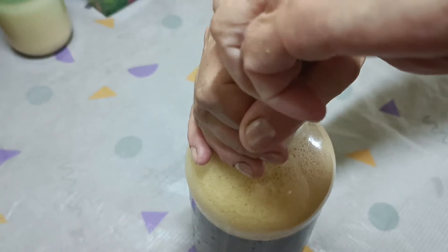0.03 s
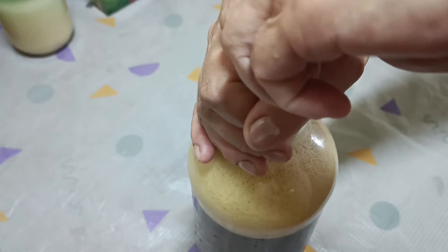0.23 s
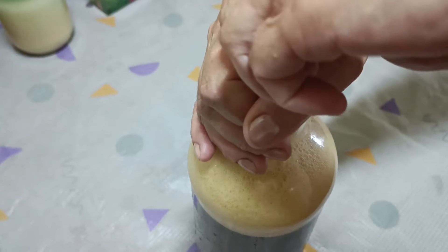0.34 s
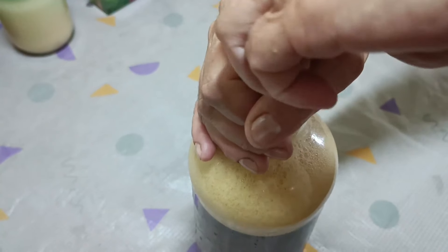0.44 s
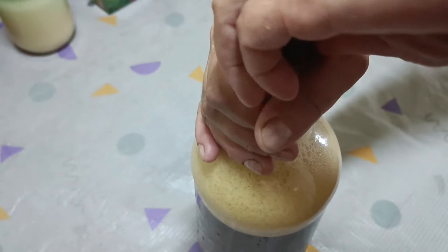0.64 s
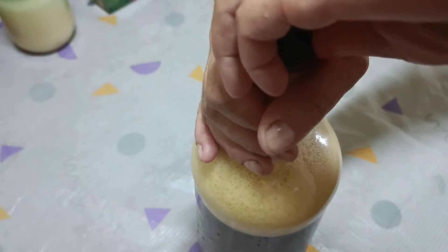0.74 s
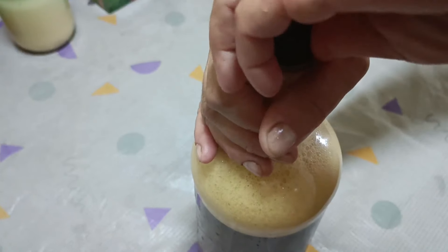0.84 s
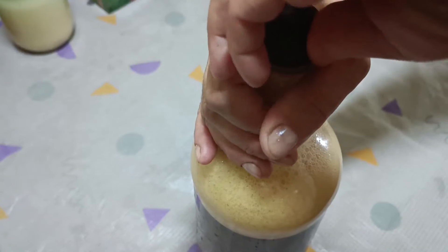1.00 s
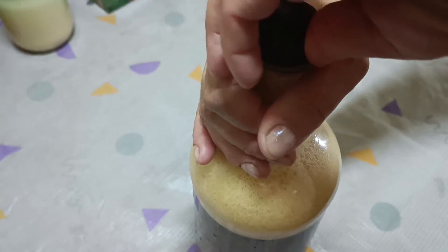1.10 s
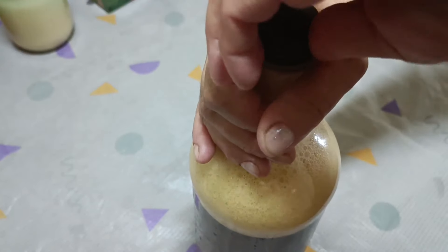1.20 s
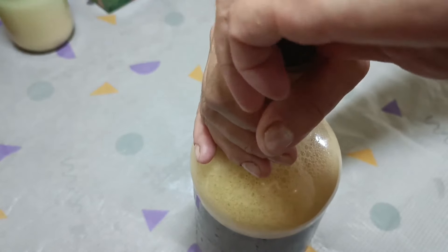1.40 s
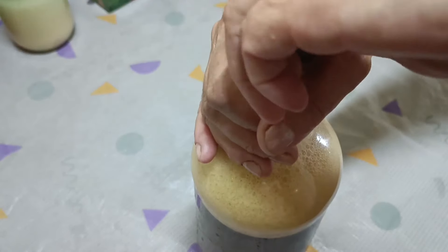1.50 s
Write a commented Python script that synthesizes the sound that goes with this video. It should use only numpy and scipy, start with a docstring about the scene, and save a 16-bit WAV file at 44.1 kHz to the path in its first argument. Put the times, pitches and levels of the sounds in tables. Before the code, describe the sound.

A short, loud hiss escapes a fizzy drink bottle, then faint cap rubs and bubble ticks.

```python
"""A screw cap is eased open on a plastic bottle of fizzy drink, close up in a small kitchen.
Over room tone and faint fizz, skin rubs the cap and a bubble ticks. Gas rushes through the thread
in one loud, sputtering hiss that buffets the hand and briefly nears a whistle; gain control ducks
the room under it. Then the hand shifts on the cap, small spurts escape and more bubbles tick."""
import sys
import numpy as np
from scipy import signal
from scipy.fft import rfft, irfft
from scipy.io import wavfile
from scipy.ndimage import uniform_filter1d

SR = 44100
rng = np.random.default_rng(int(sys.argv[2]) if len(sys.argv) > 2 else 0)


def inscribe(sig):
    """Save sig as 16-bit PCM at rate SR to the path in sys.argv[1].

    A 1-D sig is mono; a 2-D sig holds one channel per row.
    Samples are clipped to [-1, 1] before scaling.
    """
    pcm = np.round(np.clip(np.atleast_2d(sig).T, -1, 1) * 32767)
    wavfile.write(sys.argv[1], SR, pcm.astype(np.int16))


N = 68355
TIME_S, FREQ_HZ = np.arange(N) / SR, np.fft.rfftfreq(N, 1 / SR)
FLUTTER_HZ, BAND_LIMIT_HZ = 157, 15780

# spectra (frequency [Hz], relative density [dB])
ROOM_SPECTRUM = [(20, -22), (48, -17), (85, -4), (140, 0.5), (290, -1), (450, -5), (950, -16.5),
                 (2000, -19.5), (3200, -20.5), (3800, -19.5), (5000, -19.5), (6600, -17), (8300, -19.5),
                 (8900, -27), (11000, -24), (13300, -24), (15400, -21)]  # room air and microphone hiss
BUBBLE_SPECTRUM = [(1000, -30), (6800, -23), (8350, -6), (9000, -9), (12500, -25), (15000, -10)]
RUB_SPECTRUM = [(200, -25), (700, 0), (1200, -3), (1850, 5), (2900, -8), (4300, -13.5), (5500, 2),
                (7300, -6.5), (9000, -22.5), (15500, -16)]  # skin on plastic
SPURT_SPECTRUM = [(1000, -34.5), (3300, -21), (4000, -5.5), (4500, 2), (5400, -1), (6200, -13), (7400, -6),
                  (8200, -6.5), (9200, -8.5), (10200, -19), (11000, -15), (15500, -27)]
JET_SPECTRUM = [(30, -33.5), (170, -40), (650, -33), (1200, -34.5), (1450, -30.5), (2100, -25.5),
                (2800, -19), (3300, -10), (3800, -9.5), (4500, -8.5), (5100, -5), (5650, -6.5),
                (6600, -4.5), (7700, -2.5), (8300, -3), (8800, -7.5), (9850, -17), (10800, -6.5),
                (12200, -18), (13600, -11.5), (14500, -11.5), (15700, -11)]  # through cap and cupped hand
# stereo likeness (frequency [Hz], left-right correlation [-1..1])
ROOM_CORRELATION = [(50, 0), (300, 0.11), (1000, 0), (4000, 0)]
JET_CORRELATION = [(200, 0.25), (800, 0.98), (1500, 0.39), (2000, -0.17), (2700, 0.3), (3100, 0.88),
                   (3800, 0.78), (4400, -0.16), (5400, 0.33), (6700, -0.37), (7400, 0.031), (8200, -0.49),
                   (9500, 0.14), (15000, 0.15)]
# hand moves on the cap (peak time [s], rise [s], decay [s], rub [dB], spurt [dB])
CAP_TURNS = [(0.13, .014, 0.015, -49.5, -58), (0.866, 0.014, .05, -52, -56),
             (.93, 0.012, 0.026, -59.5, -60), (1.027, 0.0053, 0.026, -43.5, -74),
             (1.033, 0.0022, 0.0048, -48, -47.5), (1.24, 0.0077, 0.03, -55.5, -44),
             (1.2479, 0.0019, 0.0024, -66, -33.5), (1.335, 0.011, 0.01, -52, -55.5),
             (1.546, 0.016, 0.013, -48, -56)]
# bursting bubbles (time [s], relative level [dB])
BUBBLE_BURSTS = [(.18, -29), (.72, -22), (.872, -25), (1.287, -23), (1.359, -23), (1.391, -25),
                 (1.4125, -23), (1.422, -23), (1.4405, -26), (1.524, -25)]
# jet direction (frequency [Hz], left minus right [dB])
JET_PAN = [(1000, -2), (2050, 7), (2600, -14.5), (3100, 0.5), (3550, 1), (4300, 5.5), (5250, 0), (6600, 3),
           (8000, -1.5), (9000, -10), (9900, -3), (10800, 4.5), (13500, 1), (15500, 8)]
# jet colour as the gap changes (time [s], low [dB], 6 kHz band [dB], treble [dB])
JET_BAND_GAINS = [(.21, 10, 5, 1), (0.234, 3, 1.5, -1.5), (.272, 3, 2, 3), (0.309, 1, 5.5, 3),
                  (.345, 1, -1.5, 1.5), (.39, -1.5, -1, 0), (.44, -2, 1.5, -1.5), (.48, 2, -2, 1),
                  (0.531, 1.5, 2, -4)]
# envelopes of the gas rush (time [s], relative level [dB])
FLOW_ENVELOPE = [(.199, -67), (.21, -43.5), (.218, -24.5), (.24, -11.5), (.268, -5), (.3, -7.5),
                 (.325, -9.5), (.36, -9), (.395, -9), (.44, -9.5), (.475, -12), (.497, -26), (.512, -40.5),
                 (.545, -40.5), (.563, -76)]
BUFFET_ENVELOPE = [(.205, -52), (.245, -45.5), (.278, -42), (.305, -76)]
WHISTLE_ENVELOPE = [(.25, -36), (.305, -6), (.328, -4), (.355, -5.5), (.378, -7), (.389, 0), (.41, -12),
                    (.47, -50), (.5, -65.5)]
# resonances (frequency [Hz], width [Hz], boost [dB])
CAP_GAP_MODES = [(1445, 114, 3), (2050, 93, 3), (3847, 73, 4.5), (5210, 290, 5.5), (5280, 98, 2.5),
                 (5750, 88, 3.5)]
LEFT_PORT_MODES = [(7366, 396, 9.03), (8900, 200, 1.7)]
RIGHT_PORT_MODES = [(8347, 160, 11.24)]
# hand, table and close hard surfaces (left delay [s], right delay [s], level [dB])
REFLECTIONS = [(.0031, 0.0037, -17.5), (.0074, 0.005, -12), (0.0114, .0139, -23.5)]


def amp(db):
    """Decibels to gain."""
    return 10 ** (np.asarray(db) / 20)


def unit_rms(x):
    """Scale to rms 1."""
    return x / np.sqrt(np.mean(x ** 2) + 1e-20)


def over_hz(points):
    """Interpolate a table over log frequency."""
    hz, value = np.transpose(points)
    return np.interp(np.log(FREQ_HZ + 1), np.log(hz), value)


def envelope(points):
    """Gain from a level curve, silent outside it."""
    return amp(np.interp(TIME_S, *np.transpose(points), left=-np.inf, right=-np.inf))


def filtered(x, gain):
    """Apply a gain per frequency."""
    return irfft(rfft(x) * gain, N)


def resonances(modes):
    """Flat response plus resonant peaks."""
    return 1 + sum((amp(db) - 1) / (1 + 2j * (FREQ_HZ - hz) / width_hz) for hz, width_hz, db in modes)


def pan(left_db):
    """Stereo gains from left minus right level."""
    return amp(np.array([[.5], [-.5]]) * left_db)


def noise(correlation=0):
    """Stereo white noise."""
    left, other = rng.standard_normal((2, N))
    shared = np.clip(correlation, -1, 1)
    return np.array([left, filtered(left, shared) + filtered(other, np.sqrt(1 - shared ** 2))])


def wobble(rate_hz):
    """Low-passed random motion, rms 1."""
    return unit_rms(filtered(rng.standard_normal(N), np.exp(-(FREQ_HZ / rate_hz) ** 2)))


def clicks(per_s, spread_db):
    """Sparse stereo impulses of uneven size."""
    size = amp(spread_db * np.minimum(rng.exponential(1, N), 4))
    return unit_rms(size * (rng.random(N) < per_s / SR) * rng.standard_normal((2, N)))


def fluttering_noise(correlation, bands=9, depth_db=2.13):
    """Noise whose bands flutter independently."""
    white = noise(correlation)
    centres_hz = np.linspace(0, BAND_LIMIT_HZ, bands)
    parts = (filtered(white, np.interp(FREQ_HZ, centres_hz, band)) for band in np.eye(bands))
    return unit_rms(sum(part * amp(depth_db * wobble(FLUTTER_HZ)) for part in parts))


def room_tone(level_db=-48):
    """Low murmur of room air, thin microphone hiss."""
    air = filtered(noise(over_hz(ROOM_CORRELATION)), amp(over_hz(ROOM_SPECTRUM)))
    return amp(level_db) * unit_rms(air)


def bubbles(fizz_db=-69, tick_db=-16.5, decay_s=0.0012):
    """Bursting bubbles: constant faint fizz, single bright ticks."""
    fizz = amp(fizz_db) * clicks(per_s=140, spread_db=6.5)
    bursts = sum(amp(db) * (TIME_S >= at_s) * np.exp(-abs(TIME_S - at_s) / decay_s)
                 for at_s, db in BUBBLE_BURSTS)
    ticks = amp(tick_db) * bursts * noise()
    return filtered(fizz + ticks, unit_rms(amp(over_hz(BUBBLE_SPECTRUM)))) * pan(left_db=-2.5)


def cap_turns():
    """Skin rubs the cap and gas spurts out, swelling and dying together."""
    rub_gain, spurt_gain = np.zeros((2, N))
    for peak_s, rise_s, decay_s, rub_db, spurt_db in CAP_TURNS:
        swell = np.exp(-np.maximum((peak_s - TIME_S) / rise_s, (TIME_S - peak_s) / decay_s))
        rub_gain = np.hypot(rub_gain, amp(rub_db) * swell)
        spurt_gain = np.hypot(spurt_gain, amp(spurt_db) * swell)
    rub = unit_rms(filtered(fluttering_noise(correlation=0.15), amp(over_hz(RUB_SPECTRUM))))
    spurt = unit_rms(filtered(fluttering_noise(correlation=0.18), amp(over_hz(SPURT_SPECTRUM))))
    return rub_gain * rub * pan(left_db=3) + spurt_gain * spurt * pan(left_db=6.5)


def gas_hiss(spray_db=-11, sputter_db=0.13):
    """Turbulent gas and fine spray pass the thread and ring the gap under the cap."""
    gas = fluttering_noise(over_hz(JET_CORRELATION))
    spray = amp(spray_db) * clicks(per_s=1800, spread_db=3)
    response = amp(over_hz(JET_SPECTRUM)) * resonances(CAP_GAP_MODES) * pan(over_hz(JET_PAN))
    jet = gap_colour(unit_rms(filtered(gas + spray, response)))
    return jet * envelope(FLOW_ENVELOPE) * amp(sputter_db * wobble(FLUTTER_HZ))


def gap_colour(jet, low_hz=3030, mid_hz=5960, mid_width_hz=700, treble_hz=8900):
    """The changing gap raises and lowers three bands of the jet."""
    times_s, *gains_db = np.transpose(JET_BAND_GAINS)
    low = 1 / (1 + (FREQ_HZ / low_hz) ** 10)
    mid = np.exp(-((FREQ_HZ - mid_hz) / mid_width_hz) ** 2)
    treble = 1 - 1 / (1 + (FREQ_HZ / treble_hz) ** 20)
    return jet + sum(filtered(jet, band) * (amp(np.interp(TIME_S, times_s, db)) - 1)
                     for band, db in zip((low, mid, treble), gains_db))


def buffet(centre_hz=159):
    """Soft low puff as the first gas strikes the hand."""
    bandpass = 1 / (1 + (FREQ_HZ / centre_hz - centre_hz / (FREQ_HZ + 1)) ** 2)
    return envelope(BUFFET_ENVELOPE) * unit_rms(filtered(noise(correlation=0.44), bandpass))


def whistle(centre_hz=7400, jitter_hz=161, flutter_db=2.23, gain_db=-10):
    """Unsteady edge tone in the thread."""
    pitch_hz = centre_hz + jitter_hz * wobble(rate_hz=336)
    tone = np.sin(2 * np.pi * np.cumsum(pitch_hz) / SR) * amp(flutter_db * wobble(rate_hz=250))
    return tone * envelope(WHISTLE_ENVELOPE) * amp(gain_db) * pan(left_db=6)


def kitchen(x, wet_db=-15.5, t60_s=0.19, predelay_s=.002):
    """Close reflections comb the sound; hard walls add a short diffuse tail."""
    comb = 1 + sum(amp(db) * np.exp(-2j * np.pi * FREQ_HZ * np.array([[left_s], [right_s]]))
                   for left_s, right_s, db in REFLECTIONS)
    tail_s = TIME_S[:SR // 2]
    tail = rng.standard_normal((2, len(tail_s))) * amp(-60 * tail_s / t60_s) * (tail_s > predelay_s)
    reverb = signal.fftconvolve(x, tail / np.linalg.norm(tail[0]), axes=1)[:, :N]
    return filtered(x, comb) + amp(wet_db) * reverb


def gain_control(x, threshold_db=-19, ratio=1.99, release_db_per_s=12.5):
    """Compressor: fast attack, slow recovery."""
    power_db = 10 * np.log10(abs(uniform_filter1d((x ** 2).mean(0), size=600)) + 1e-12)
    fall_db = TIME_S * release_db_per_s
    held_db = np.maximum.accumulate(power_db + fall_db) - fall_db
    excess_db = np.maximum(held_db - threshold_db, 0)
    return x / amp((1 - 1 / ratio) * uniform_filter1d(excess_db, size=400))


def scene():
    """Room tone plus the bottle in the kitchen."""
    return room_tone() + kitchen(bubbles() + cap_turns() + gas_hiss() + buffet() + whistle())


def record(dry):
    """Ringing microphone ports, gain control, band limit."""
    ports = np.array([resonances(LEFT_PORT_MODES), resonances(RIGHT_PORT_MODES)])
    ducked = gain_control(filtered(dry, ports))
    lowpass = signal.firwin(801, BAND_LIMIT_HZ, window=("kaiser", 9), fs=SR)
    return signal.oaconvolve(ducked, lowpass[None], "same")


dry = scene()
out = record(dry)
inscribe(out)
```